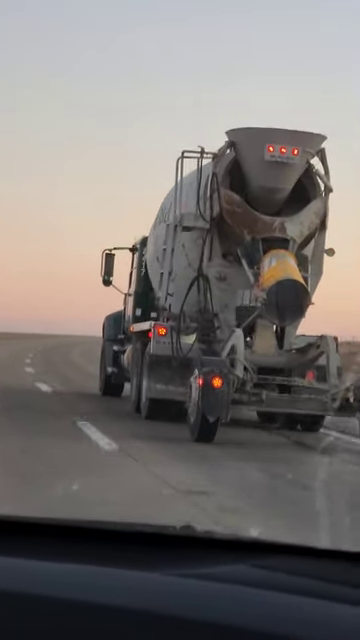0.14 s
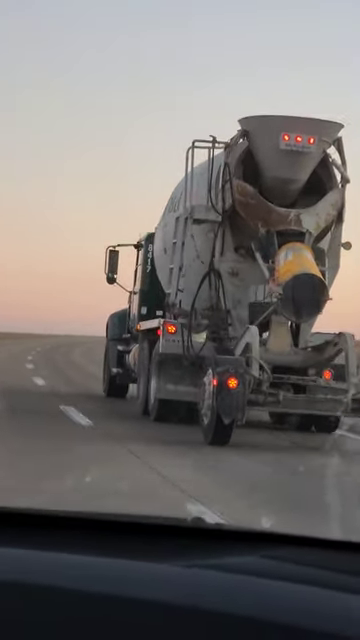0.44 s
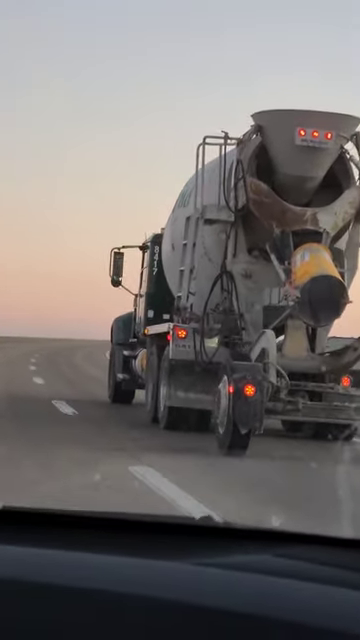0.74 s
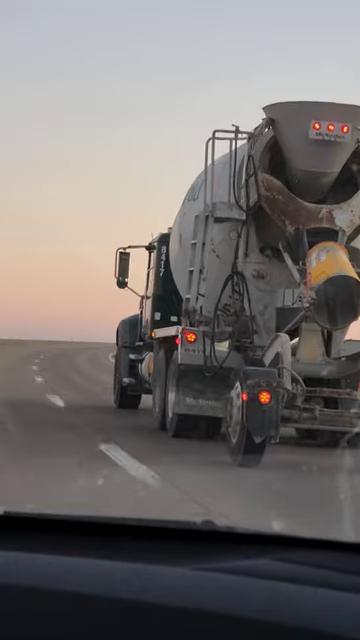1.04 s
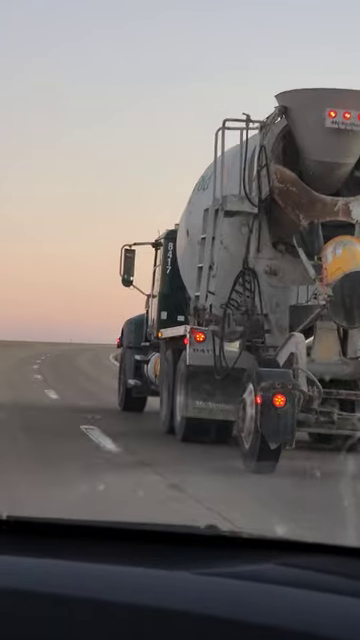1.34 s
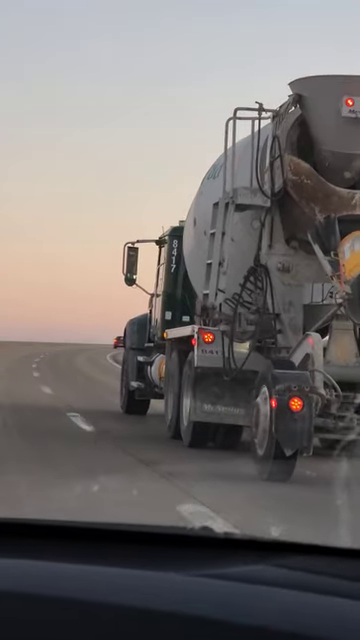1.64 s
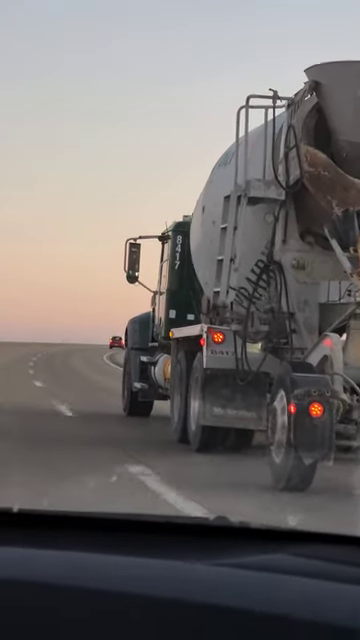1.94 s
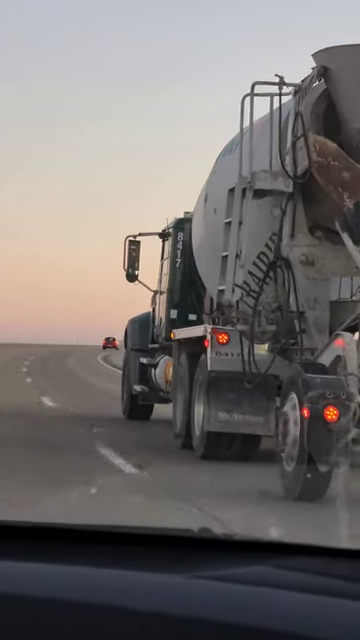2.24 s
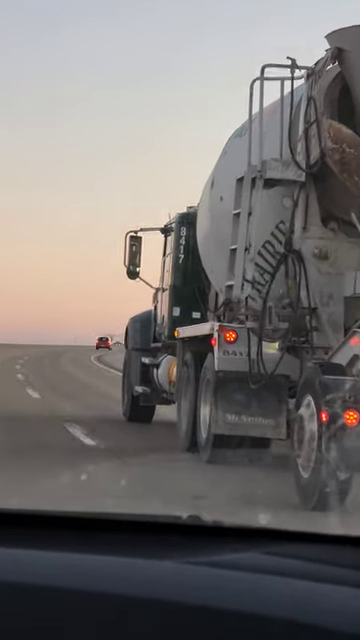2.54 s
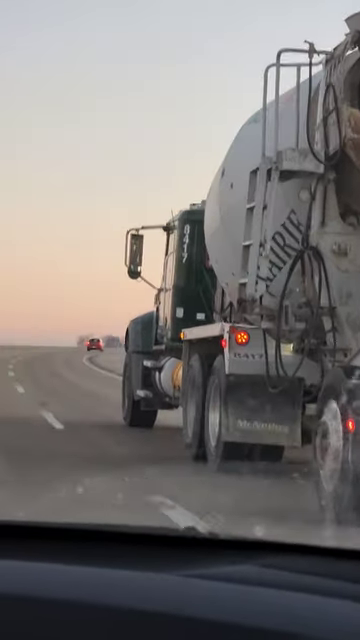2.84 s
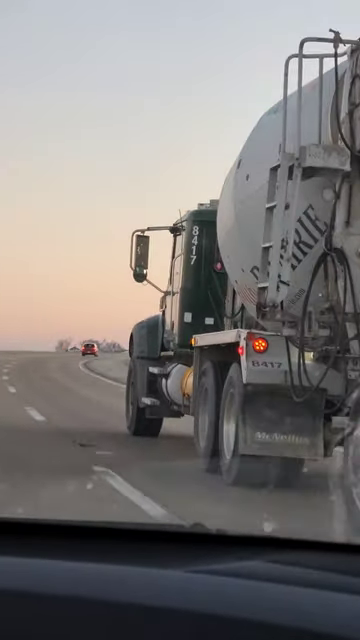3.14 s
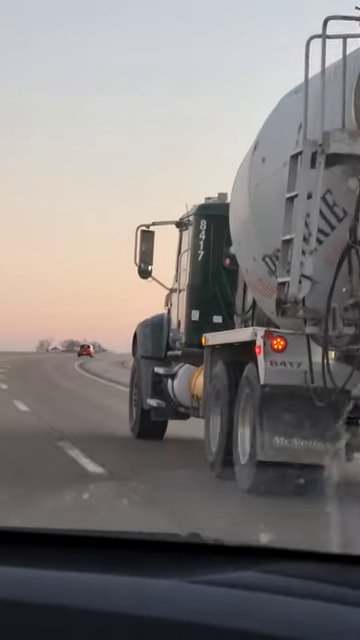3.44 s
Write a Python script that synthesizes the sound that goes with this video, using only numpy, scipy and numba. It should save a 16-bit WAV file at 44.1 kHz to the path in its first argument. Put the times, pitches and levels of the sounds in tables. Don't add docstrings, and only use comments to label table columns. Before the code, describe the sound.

Continuous deep rumble inside a car overtaking a cement truck on a highway: the shell booms and shakes with dense, irregular soft low thuds from 0 to 3.6 s. Under it, steady muffled tyre roar with a slightly hollow panel resonance and very faint wind hiss. Barely audible sleeve rubs, the clearest around 1.5-2 s; a tiny grit tick at 3.0 s. Close hand-held phone, bass nearly mono, treble wider and thinned.

```python
import sys
import numpy as np
from scipy import signal
from scipy.fft import rfft, irfft
from scipy.io import wavfile
from scipy.ndimage import uniform_filter1d, minimum_filter1d
from numba import njit

SR = 44100
rng = np.random.default_rng(int(sys.argv[2]) if len(sys.argv) > 2 else 0)


def volts_from_decibels(level):
    exponent = np.asarray(level, float) / 20
    return 10 ** exponent


def int16_out(signal):
    q = np.round(np.clip(np.atleast_2d(signal).T, -1, 1) * 32767)
    wavfile.write(sys.argv[1], SR, q.astype(np.int16))


N = 158319

# (frequency [Hz], level per Hz [dB])
WIND_COLOUR = [(3000, -3.5), (3700, -7.5), (5000, -8), (6300, -11.5), (7600, -16), (9800, -29),
               (11500, -21.5), (15500, -24.5)]
# (time [s], rise [s], hold [s], fall [s], level [dB])
SLEEVE_RUBS = [
    (0.187, 0.093, 0.03, .12, -73),
    (0.559, 0.077, 0.016, 0.059, -72.5),
    (0.762, 0.035, 0.037, .05, -76.5),
    (1.66, 0.14, 0.23, .08, -61.5),
    (2, 0.081, 0.15, .08, -74.5),
    (2.248, 0.1, 0.1, .12, -73),
    (2.829, 0.066, 0.04, 0.049, -77.5),
    (3.2, 0.017, 0.022, 0.11, -75),
]
# (frequency [Hz], level per Hz [dB])
CLOTH_COLOUR = [(3500, -4), (5000, 2.5), (6500, 2), (8000, -3.5), (9800, -7), (11500, 0.5), (13000, -6),
                (15500, -3.5)]
# (time [s], level [dB])
TYRE_LEVEL = [(0.03, -32.5), (0.14, -34), (0.17, -36), (0.2, -34.5), (0.84, -32.5), (1.67, -33.5),
              (3.25, -33), (3.27, -31.5), (3.55, -32)]
# (frequency [Hz], level per Hz [dB])
ROAR_COLOUR = [(500, -12), (780, -13.5), (1050, -4), (1200, -6.5), (1490, -7.5), (1580, -9.5), (2300, -16),
               (3900, -24)]
# (frequency [Hz], width [Hz], level [dB])
PANEL_RINGS = [(588, 39, -12.5), (920, 290, -9.5), (1119, 36, -9.5), (1350, 58, -11.5), (1400, 30, -13.5),
               (1472, 40, -10), (1671, 31, -15.5), (1790, 60, -21.5), (2070, 80, -27), (2615, 360, -17),
               (2804, 77, -24), (2958, 200, -19), (3700, 260, -26.5)]
# (frequency [Hz], width [Hz], level [dB])
CABIN_DIPS = [(740, 40, -3.5), (1155, 41, -5.5), (1550, 56, -3), (1623, 50, -3.5), (2290, 73, -3),
              (3920, 200, -5.5)]
# (time [s], level [dB])
ROAD_LEVEL = [(0.03, -11.5), (.3, -17.5), (0.9, -13), (1.4, -14.5), (1.85, -14.5), (2.3, -12.5),
              (2.7, -15.5), (3.2, -14.5), (3.5, -13)]
# (frequency [Hz], width [Hz], level [dB])
BODY_RINGS = [(30, 14, 0), (46, 8, -6.5), (60.7, 7.5, -9), (73, 13, -6), (93, 24, -2.5), (123.3, 17, -5.5),
              (144.7, 26, -3), (172.6, 22, -5.5), (203.4, 11, -12.5), (404, 49, -22.5)]
# (frequency [Hz], level per Hz [dB])
SHAKE_COLOUR = [(18, -26), (28, -7), (120, -4.5), (200, -10), (300, -17.5), (450, -27.5), (700, -36),
                (1200, -48)]
# (frequency [Hz], level per Hz [dB])
DRONE_COLOUR = [(150, -24), (230, -2), (320, -6), (410, -10), (520, -15.5), (700, -18.5), (900, -20.5)]
# (time [s], peak level [dB], ring frequency [Hz])
SEAT_THUDS = [(0.052, -8, 70.0), (0.095, -8.5, 36.0), (0.154, -10, 68.0), (0.29, -7, 44.0),
              (0.463, -8.5, 38.0), (0.537, -12, 54.0), (0.653, -9.5, 48.0), (0.853, -5.5, 44.0),
              (0.875, -6, 76.0), (0.925, -5, 44.0), (0.964, -5.5, 58.0), (1.041, -7.5, 42.0),
              (1.093, -9, 60.0), (1.107, -12, 38.0), (1.177, -8, 40.0), (1.227, -7, 70.0),
              (1.272, -12.5, 56.0), (1.358, -7.5, 46.0), (1.388, -10, 76.0), (1.49, -7, 48.0),
              (1.537, -4.5, 72.0), (1.556, -10, 36.0), (1.619, -9, 44.0), (1.669, -4.5, 70.0),
              (1.694, -5.5, 50.0), (1.764, -10.5, 56.0), (1.816, -8.5, 36.0), (1.862, -8.5, 52.0),
              (1.95, -8.5, 66.0), (1.984, -10, 34.0), (2.027, -6.5, 50.0), (2.061, -10.5, 36.0),
              (2.066, -9, 78.0), (2.132, -6, 46.0), (2.163, -12.5, 64.0), (2.24, -7, 50.0),
              (2.313, -5.5, 44.0), (2.401, -9, 46.0), (2.444, -9.5, 70.0), (2.51, -10.5, 38.0),
              (2.599, -14, 68.0), (2.683, -8.5, 44.0), (2.687, -12.5, 70.0), (2.741, -8, 44.0),
              (2.766, -12, 74.0), (2.937, -7.0, 50.0), (3.016, -14, 36.0), (3.018, -10.5, 72.0),
              (3.07, -6, 48.0), (3.213, -6, 76.0), (3.22, -10.5, 50.0), (3.361, -5, 46.0),
              (3.497, -10.5, 76.0), (3.531, -11.5, 38.0)]
# (time [s], peak level [dB], ring frequency [Hz])
CABIN_BOOMS = [(0.075, -12.5, 134.6), (0.181, -9, 101.7), (0.234, -10, 116.8), (0.254, -10, 82.4),
               (0.354, -10, 131.5), (0.397, -10.5, 98.0), (0.41, -14.5, 134.6), (0.467, -5, 83.5),
               (0.549, -8.5, 106.0), (0.578, -8, 123.4), (0.646, -14.5, 100.7), (0.658, -13.5, 125.5),
               (0.714, -8, 100.7), (0.839, -10.5, 110.2), (0.939, -4.5, 96.8), (0.973, -6.5, 125),
               (1.007, -10, 98.0), (1.075, -8.5, 80.4), (1.098, -10.5, 118.6), (1.118, -7, 96.0),
               (1.181, -7.5, 90.3), (1.19, -13, 130.5), (1.222, -10.5, 110.0), (1.34, -11, 124.0),
               (1.39, -8, 106.2), (1.431, -7, 113.4), (1.506, -5.5, 95.4), (1.526, -10.5, 129),
               (1.574, -10, 87), (1.624, -7, 110.4), (1.696, -9.5, 113.9), (1.728, -6, 88.2),
               (1.78, -9, 108.7), (2.048, -10, 100.2), (2.068, -10, 119), (2.229, -10, 103.3),
               (2.274, -11, 81.9), (2.313, -12, 128), (2.469, -12, 112.3), (2.569, -14.5, 91),
               (2.599, -13, 131), (2.617, -6.5, 106), (2.698, -8, 108.0), (2.746, -15, 148),
               (2.773, -11, 118.6), (2.839, -9, 85.5), (2.964, -8, 111), (3.059, -14, 96.3),
               (3.075, -5.5, 122.2), (3.193, -8.5, 107.3), (3.259, -10.5, 95), (3.313, -14, 140.5),
               (3.376, -10.5, 84.2), (3.44, -5.5, 107.3), (3.506, -16, 121.4), (3.565, -10.5, 106.6)]
# (frequency [Hz], level [dB])
STEREO_WIDTH = [(25, -22.5), (60, -12), (125, -19.5), (250, -10), (500, -5), (1200, -2), (3000, -3),
                (6000, 0.5)]
# (frequency [Hz], level [dB])
STEREO_LEAN = [(60, -0.7), (500, 0), (1000, -1.7), (2000, 1.5), (4000, -1.5), (8000, -2), (12000, 4)]


def level(x, db):
    return x * volts_from_decibels(db) / np.sqrt(np.mean(x ** 2))


def bin_hz():
    return np.arange(N // 2 + 1) * SR / N


def at_hz(table):
    hz, db = np.array(table).T
    return np.interp(np.log(np.maximum(bin_hz(), 1)), np.log(hz), db)


def at_s(table):
    s, db = np.array(table).T
    return volts_from_decibels(uniform_filter1d(np.interp(np.arange(N) / SR, s, db), size=1001))


def walk(rate):
    hold = int(SR / rate)
    steps = np.repeat(rng.standard_normal(N // hold + 1), hold)
    return uniform_filter1d(uniform_filter1d(steps, hold), hold)[:N]


def colour(table, flicker_db, rate):
    octaves = np.log2(np.maximum(bin_hz(), 1))
    low, high = np.log2(table[0][0]), np.log2(table[-1][0])
    past_ends = np.maximum(low - octaves, 0) + np.maximum(octaves - high, 0)
    spectrum = rfft(rng.standard_normal((2, N))) * volts_from_decibels(at_hz(table) - 48 * past_ends)
    out = 0
    for octave in range(int(low) - 1, int(high) + 3):
        share = np.clip(1 - abs(octaves - octave), 0, 1)
        out = out + irfft(spectrum * share, N) * volts_from_decibels(flicker_db * walk(rate))
    return level(out, 0)


def dips_and_peaks(hz, width):
    return 1 / (1 + (2 * (bin_hz() - hz) / width) ** 2)


def ring(modes, flicker_db, rate):
    out = 0
    for hz, width, db in modes:
        noise = rfft(rng.standard_normal((2, N)))
        tone = level(irfft(noise * dips_and_peaks(hz, width), N), db)
        out = out + tone * volts_from_decibels(flicker_db * walk(rate))
    return out


def cells(x, draw, bins, frames):
    f, t, spectrum = signal.stft(x, SR, nperseg=1024, noverlap=768)
    db = draw(f[::bins, None], (len(f[::bins]), len(t[::frames])))
    db = db.repeat(bins, axis=0).repeat(frames, axis=1)[:len(f), :len(t)]
    return signal.istft(spectrum * volts_from_decibels(db), SR, nperseg=1024, noverlap=768)[1][:, :N]


def wind():
    return volts_from_decibels(-55.5) * colour(WIND_COLOUR, 0.98, 13)


def grit():
    tick_s, tick_db, t60_s = 3.034, -57.5, 0.11
    t = np.arange(N) / SR - tick_s
    fade = (t > 0) * np.exp(-np.log(1000) * np.maximum(t, 0) / t60_s)
    return volts_from_decibels(tick_db) * fade * colour(CLOTH_COLOUR, 0, 20)


def sleeve():
    t = np.arange(N) / SR
    rubs = 0
    for start, rise, hold, fall, db in SLEEVE_RUBS:
        swell = 1 + (t - start) / rise
        fade = 1 - (t - start - hold) / fall
        rubs = rubs + volts_from_decibels(db) * np.clip(np.minimum(swell, fade), 0, 1)
    grain = volts_from_decibels(1.5 * walk(90))
    return rubs * grain * colour(CLOTH_COLOUR, 0.82, 22)


def tyres():
    roar = colour(ROAR_COLOUR, 0.51, 7.3) + ring(PANEL_RINGS, 1.8, 5)
    patchy_db = 1.2
    roar = cells(roar, lambda f, size: patchy_db * rng.standard_normal(size), 2, 14)
    dips_db = sum(db * dips_and_peaks(hz, width) for hz, width, db in CABIN_DIPS)
    roar = irfft(rfft(roar) * volts_from_decibels(dips_db), N)
    return level(roar, 0) * at_s(TYRE_LEVEL)


def jolts(table):
    swell_s, side_db = 0.024, -1
    out = np.zeros((2, N))
    phases = rng.random((len(table), 2))
    for (s, db, hz), phase in zip(table, phases):
        first = max(int((s - 4 * swell_s) * SR), 0)
        at = slice(first, int((s + 4 * swell_s) * SR))
        t = np.arange(N)[at] / SR - s
        swell = np.exp(-.5 * (t / swell_s) ** 2)
        out[:, at] += volts_from_decibels(db) * swell * np.cos(2 * np.pi * (hz * t + phase[:, None]))
    return out * volts_from_decibels(np.array([[0], [side_db]]))


def body():
    shake_db, drone_db = -6.5, -27.5
    boom = level(ring(BODY_RINGS, 1.9, 3.0), 0) + volts_from_decibels(shake_db) * colour(SHAKE_COLOUR, 0.7, 11)
    boom = level(boom, 0) * at_s(ROAD_LEVEL)
    drone = volts_from_decibels(drone_db) * colour(DRONE_COLOUR, 0.47, 2.8)
    return boom + jolts(SEAT_THUDS) + jolts(CABIN_BOOMS) + drone


def spread(x):
    mid, side = rfft(x)
    side = side * volts_from_decibels(at_hz(STEREO_WIDTH))
    lean = volts_from_decibels(at_hz(STEREO_LEAN) / 2)
    return irfft(np.array([(mid + side) * lean, (mid - side) / lean]), N)


def gated(x):
    gate_hz, share, gate_db = 7300, .6, -32
    return cells(x, lambda f, size: gate_db * (rng.random(size) < share) * (f > gate_hz), 2, 4)


def scene():
    cloth = sleeve()
    faint = gated(spread(cloth + wind()))
    clear_cloth = volts_from_decibels(-3.5) * cloth
    return faint + spread(grit() + clear_cloth + tyres() + body())


@njit
def follow(x, release):
    e, out = 0., np.empty(len(x))
    for i in range(len(x)):
        e = x[i] if x[i] > e else e + (x[i] - e) * release
        out[i] = e
    return out


def limit_bass(x):
    split_hz, release_s, ceiling_db = 260, 0.02, -.4
    bass = signal.sosfiltfilt(signal.butter(2, split_hz, fs=SR, output="sos"), x)
    peak = follow(np.abs(x).max(axis=0), 1 / (release_s * SR))
    gain = minimum_filter1d(np.minimum(1, volts_from_decibels(ceiling_db) / (peak + 1e-9)), size=801)
    gain = uniform_filter1d(uniform_filter1d(gain, size=401), size=401)
    return x - bass * (1 - gain)


def low_pass(x):
    return signal.sosfilt(signal.butter(12, 15480, fs=SR, output="sos"), x)


def record(dry):
    low_cut_hz, edge_hz, edge_share, edge_db = 26, 15200, .5, -32
    mix = signal.sosfiltfilt(signal.butter(6, low_cut_hz, "high", fs=SR, output="sos"), dry)
    mix = cells(mix, lambda f, size: edge_db * (rng.random(size[1]) < edge_share) * (f > edge_hz), 1, 8)
    return low_pass(limit_bass(mix))


dry = scene()
out = record(dry)
int16_out(out)
```